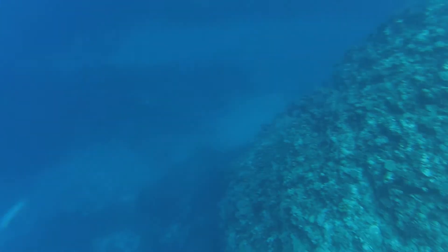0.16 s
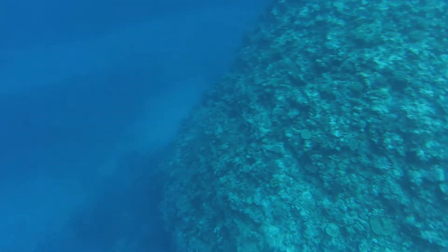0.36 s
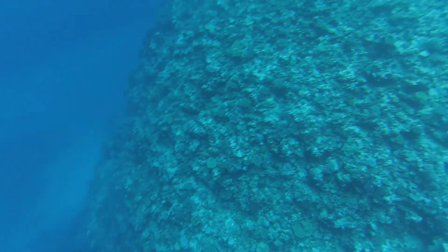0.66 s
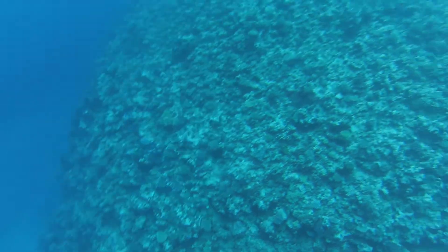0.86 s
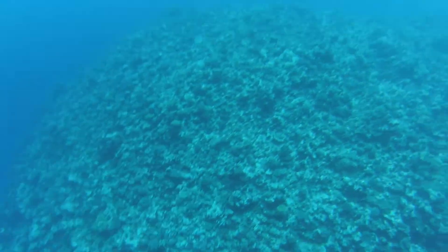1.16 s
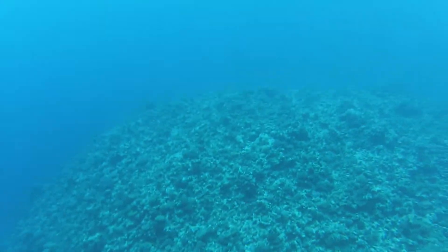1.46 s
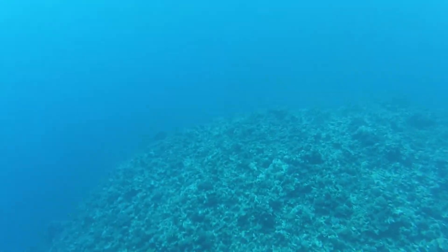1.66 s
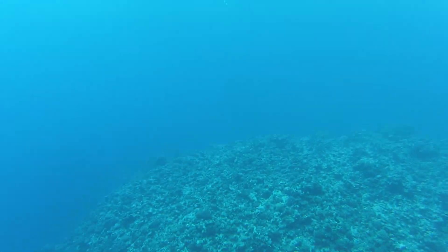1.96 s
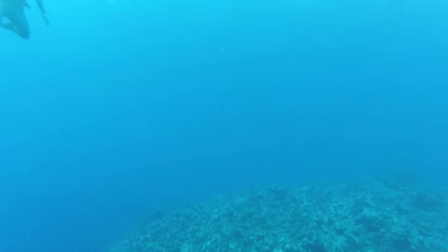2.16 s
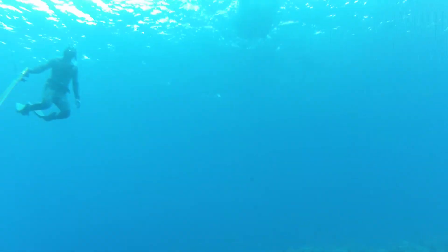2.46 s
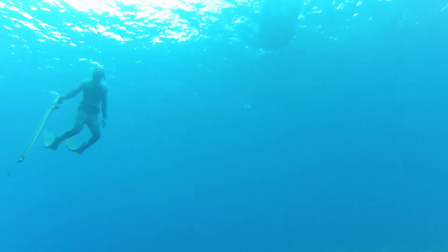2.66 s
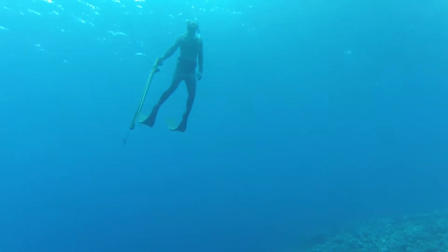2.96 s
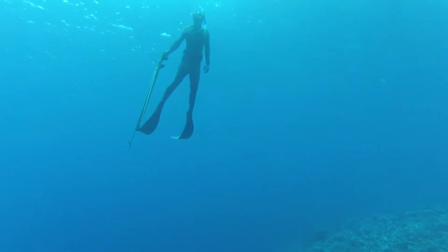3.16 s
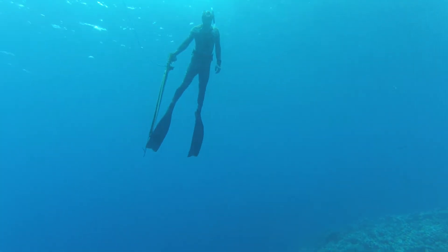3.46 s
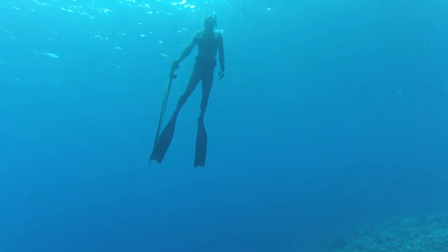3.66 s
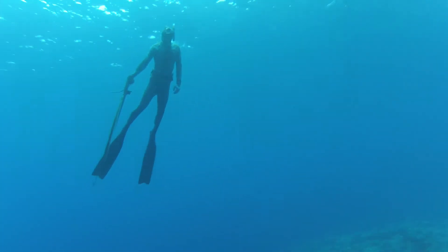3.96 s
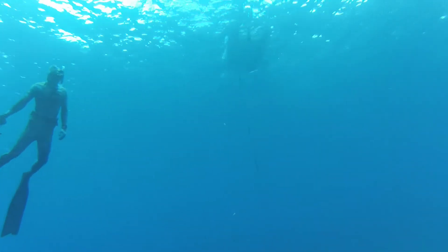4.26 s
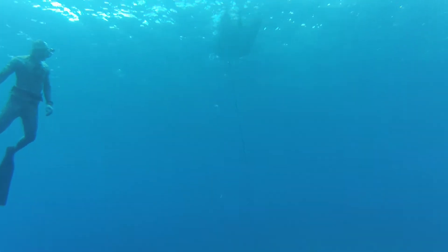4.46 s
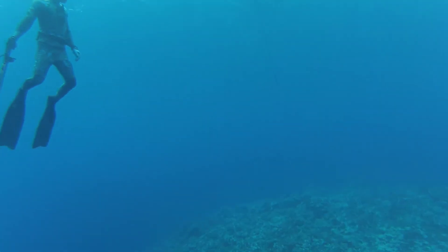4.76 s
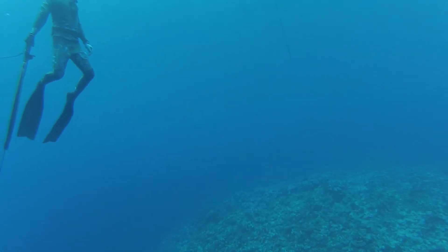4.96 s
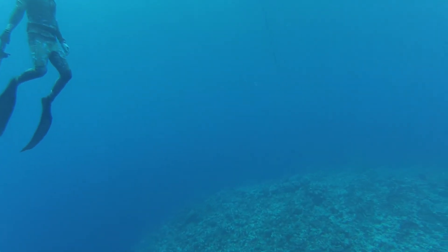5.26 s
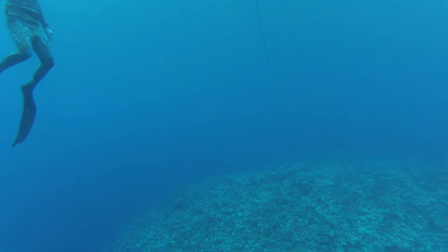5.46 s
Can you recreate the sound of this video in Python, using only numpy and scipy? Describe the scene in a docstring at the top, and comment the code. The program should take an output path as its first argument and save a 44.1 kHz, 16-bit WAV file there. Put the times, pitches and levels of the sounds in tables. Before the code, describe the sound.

Heard from inside a sealed camera housing underwater: a few bright bubble plinks and tiny snaps over low water rumble, then from about one second a dense gurgling burst of chirping bubbles and froth. After two seconds a purring leak and dry, squeaky creaks of the seal take over. It thins out to scattered ticks and bubbles, with a cluster of hard knocks near the end.

```python
"""Bubbles of trapped air break away from a camera's waterproof housing as it rises from a reef to the surface.
They ring as single damped tones, quick strings, froth, a random trickle and one even train.
As the pressure eases, the housing's seal creaks in stick-slip runs, and knocks ring the shell.
Behind them, shaped noise makes the rumble of passing water and the sea's hiss, short cracks make the
reef's snaps, and steady tones make the camera's thin whine."""
import sys
import numpy as np
from scipy import signal
from scipy.fft import rfft, irfft, next_fast_len
from scipy.io import wavfile
from scipy.ndimage import uniform_filter1d

SR = 44100
rng = np.random.default_rng(int(sys.argv[2]) if len(sys.argv) > 2 else 0)


def materialize(psi):
    """Save the field psi as 16-bit PCM at rate SR to the path in sys.argv[1].

    A 1-D psi becomes a single channel; in a 2-D psi each row is a channel.
    """
    bounded = np.clip(np.atleast_2d(psi).T, -1, 1)
    quanta = np.round(bounded * 32767).astype(np.int16)
    wavfile.write(sys.argv[1], SR, quanta)


N = 246959
TIME = np.arange(N) / SR  # seconds through the scene
RING = np.arange(4096) / SR  # seconds through one short sound


def gain_of(db):
    """Turns decibels into a factor."""
    return 10 ** (np.asarray(db) / 20)


def evened(x):
    """Scales a sound to an rms of 1."""
    return x / np.sqrt(np.mean(x ** 2) + 1e-20)


def peaked(x):
    """Scales a short sound so that its loudest 3 ms have an rms of 1."""
    power = uniform_filter1d(x ** 2, size=132, mode="constant")
    return x / np.sqrt(power.max() + 1e-20)


def add(mix, s, sound):
    """Adds a sound to the mix at s seconds."""
    part = mix[max(round(s * SR), 0):][:len(sound)]
    part += sound[:len(part)]


def follow(rows):
    """Draws straight lines between the rows of a table: one curve for each column after the time."""
    s, *columns = np.transpose(rows)
    return [np.interp(TIME, s, column) for column in columns]


def read(points, hz):
    """Reads the level in dB of a spectrum at hz, between points on a log-frequency axis."""
    f, db = np.transpose(points)
    return np.interp(np.log(hz + 1), np.log(f + 1), db)


def noise(points):
    """Makes noise of rms 1 whose spectrum has the given shape."""
    size = next_fast_len(N)
    colour = gain_of(read(points, np.fft.rfftfreq(size, 1 / SR)))
    white = rng.standard_normal(size)
    return evened(irfft(rfft(white) * colour, size)[:N])


def band(x, lo_hz, hi_hz):
    """Keeps what lies between two frequencies."""
    edges = np.sort(np.clip([lo_hz, hi_hz], 20, SR / 2 - 1))
    return signal.sosfilt(signal.butter(4, edges, "bandpass", fs=SR, output="sos"), x)


def fade_out(t60):
    """Dies away exponentially, by 60 dB in t60 seconds."""
    return np.exp(-np.log(1000) * RING / t60)


def swell_in(rise):
    """Grows from silence to full size with a time constant of rise seconds."""
    return 1 - np.exp(-RING / rise)


def ring(hz, t60, rise=0.0001, glide=0):
    """Makes one damped tone; glide is its relative rise in pitch over t60 seconds."""
    age = np.minimum(RING / max(t60, 1e-4), 2)
    turns = np.cumsum(hz * (1 + glide * age)) / SR
    return np.sin(2 * np.pi * turns) * np.exp(-np.log(1000) * age) * swell_in(rise)


def splash(lo_hz, hi_hz, t60, rise=0.0001):
    """Makes a short burst of noise in one band that swells and dies."""
    burst = rng.standard_normal(len(RING)) * fade_out(t60) * swell_in(rise)
    return peaked(band(burst, lo_hz, hi_hz))


def causal(points, tilt_db=0):
    """Makes a sharp-fronted (minimum-phase) click with the given spectrum, tilted in dB per octave."""
    hz = np.fft.rfftfreq(len(RING), 1 / SR)
    octaves = np.log2(np.clip(hz, 250, 4000) / 1000)
    db = read(points, hz) + tilt_db * octaves
    # folding the cepstrum forward packs the energy at the start
    cepstrum = irfft(np.log(gain_of(db)))
    cepstrum[1:len(RING) // 2] *= 2
    cepstrum[len(RING) // 2 + 1:] = 0
    return peaked(irfft(np.exp(rfft(cepstrum))))


# spectrum of the sea's hiss: (frequency [Hz], relative level [dB])
HISS_SPECTRUM = [(200, -2), (400, 9), (700, 21), (950, 13), (1300, -23), (2400, 22.5), (3100, 4.5),
                 (4100, 13.5), (5200, -2), (6700, 8), (8500, -2.5), (10600, 8), (12500, -3), (14300, 3),
                 (15400, -19)]
def sea_hiss(hiss_db=-60.5, ticks_db=-66, ticks_per_s=450):
    """Countless far ticks of random size lie in a steady noise of the same colour."""
    happens = rng.random(N) < ticks_per_s / SR
    sizes = gain_of(4.5 * np.minimum(rng.exponential(1, N), 4))
    clicks = happens * rng.choice([-1, 1], N) * sizes
    ticks = evened(signal.oaconvolve(clicks, causal(HISS_SPECTRUM))[:N])
    return gain_of(hiss_db) * noise(HISS_SPECTRUM) + gain_of(ticks_db) * ticks


# tones of the camera's electronics: (frequency [Hz], level [dB])
WHINE_TONES = [(11073, -90), (13066, -78), (13126, -77)]
def camera_whine(waver_rad=0.44):
    """Thin steady tones waver as slow noise pushes their phase to and fro."""
    out = np.zeros(N)
    for hz, db in WHINE_TONES:
        waver = waver_rad * noise([(2, -2), (15, -15), (80, -27), (300, -120)])
        out += gain_of(db) * np.sqrt(2) * np.sin(2 * np.pi * hz * TIME + waver)
    return out


def fizz(level_db=-33):
    """High noise rises and falls with the finest bubbles of the trickle."""
    fine_db = follow(TRICKLE_LEVELS)[-1]
    return gain_of(fine_db + level_db) * noise([(4000, -34), (7000, -47), (9000, 18), (12500, 34), (15400, 24)])


def crackle(far_db=-75, fizzing_db=-20, per_s=60, spread_db=6.0, ping_db=-3):
    """Faint snaps from the reef come at random, each with a ping, louder while the finest bubbles stream out."""
    out = np.zeros(N)
    wait, size, pitch = rng.random((400, 3)).T
    times = np.cumsum(-np.log(1 - wait)) / per_s
    strengths = np.minimum(-np.log(1 - size), 3)
    for s, strength, hz in zip(times, strengths, 6000 + 7000 * pitch):
        crack = splash(lo_hz=4200, hi_hz=11500, t60=0.007, rise=0.0006)
        ping = peaked(ring(hz, t60=0.008, rise=0.0004))
        add(out, s, gain_of(spread_db * strength) * peaked(crack + gain_of(ping_db) * ping))
    fine_db = follow(TRICKLE_LEVELS)[-1]
    return out * np.hypot(gain_of(far_db), gain_of(fine_db + fizzing_db))


# sharp snaps, likely shrimp on the reef or the tiniest bubbles:
# (time [s], level before level_db [dB], ping pitch [Hz])
SNAP_EVENTS = [(0.0593, -36, 5260), (0.083, -49, 4570), (0.2089, -43, 6000), (0.302, -37, 4670),
               (0.5117, -37, 4560), (0.566, -31, 4770), (0.9305, -31.5, 7100), (1.053, -32, 5020),
               (1.1154, -30, 4600), (1.265, -34.5, 7000), (1.4033, -24.5, 5920), (1.452, -38, 6450),
               (1.769, -38, 4660), (2.8416, -36.5, 6760), (3.615, -46, 11900), (0.5649, -37.5, 11260),
               (0.964, -39, 6900), (0.9714, -49, 11700), (0.9943, -42, 12600), (1.114, -42, 11600),
               (0.9523, -40, 6030), (1.1054, -39, 6050), (1.1564, -46, 6040), (1.188, -40, 7150),
               (1.2311, -37, 6000), (1.5377, -56, 5410), (1.3645, -39, 11900), (1.482, -33.5, 6400),
               (1.4987, -44, 12600), (1.769, -39.5, 11800), (2.0614, -45, 13280), (2.134, -34.5, 6000),
               (2.168, -36.5, 6340), (3.85, -46, 13200), (4.9968, -34, 5500), (5.1234, -39.5, 7110)]
def snaps(level_db=-7, ping_db=8):
    """Each near snap is a broad crack of noise with a short ping."""
    out = np.zeros(N)
    for s, db, hz in SNAP_EVENTS:
        crack = splash(lo_hz=3020, hi_hz=14600, t60=0.0018)
        ping = peaked(ring(hz, t60=0.015))
        add(out, s, gain_of(db + level_db) * peaked(crack + gain_of(ping_db) * ping))
    return out


# water round the housing, before the trims: (time [s], slow buffeting level [dB], rumble level [dB])
FLOW_LEVELS = [(0, -35.5, -46.5), (0.85, -40.5, -43.5), (1.2, -37.5, -43), (1.55, -42.5, -45),
               (1.65, -30, -40.5), (1.9, -43.5, -38.5), (2.3, -32.5, -39.5), (2.6, -39, -39),
               (2.85, -41, -41), (3.6, -38, -41), (4.7, -42, -38), (5.6, -37, -44)]
# strong eddies that swell the flow: (time [s], time from centre to 1/e [s], swell [dB])
SURGE_EVENTS = [(1.08, 0.039, 7), (1.29, 0.042, 6), (1.457, 0.024, 9), (1.76, 0.025, 5), (2.66, 0.023, 7),
                (4.16, 0.032, 2.5), (4.99, .03, 4.5)]
# spectrum of the slow buffeting: (frequency [Hz], relative level [dB])
BUFFET_SPECTRUM = [(4.7, -7), (8.0, 4), (22, 0), (70, -16), (91, -26), (150, -120)]
# spectrum of the rumble: (frequency [Hz], relative level [dB])
RUMBLE_SPECTRUM = [(40, -12.5), (62, 0), (100, -1.5), (145, -4.5), (175, -3.5), (215, -14), (290, -20.5),
                   (450, -24.5), (900, -104)]
def flow(buffet_trim_db=3.0, rumble_trim_db=-2, eddy_db=2.0, surge_share=0.57):
    """Eddies press slowly on the housing and rumble in its lowest resonance; a few strong ones swell both."""
    buffet_db, rumble_db = follow(FLOW_LEVELS)
    eddies = noise([(2, 0), (8, 0), (20, -40), (60, -120)])
    surge_db = sum(db * np.exp(-((TIME - s) / width) ** 2) for s, width, db in SURGE_EVENTS)
    buffet_gain = gain_of(buffet_db + buffet_trim_db + surge_share * surge_db)
    rumble_gain = gain_of(rumble_db + rumble_trim_db + surge_db + eddy_db * eddies)
    return buffet_gain * noise(BUFFET_SPECTRUM) + rumble_gain * noise(RUMBLE_SPECTRUM)


# the shell's broad, well damped answer to a knock: (frequency [Hz], relative level [dB])
SHELL_SPECTRUM = [(120, -18.5), (280, -5), (420, 2.5), (560, -2), (740, 7.5), (1020, -7.5), (1400, -3.5),
                  (1780, -10), (2050, -30), (2300, -16.5), (2750, -41), (4500, -54), (9000, -80)]
# knocks of the grip on the housing:
# (time [s], clack level before level_db [dB], thud re clack before thud_trim_db [dB], tilt [dB per octave])
KNOCK_EVENTS = [(1.095, -31, -10, -4.5), (1.194, -34, -9, 1.5), (1.208, -34.5, -12, 2),
                (2.409, -40, -25, -14), (3.292, -44, -1, -10), (3.648, -36, -6, 8), (4.087, -39.5, 2, -9),
                (4.137, -34, -5, 1), (4.159, -39.5, 8.5, -11), (4.514, -35, -6, 6), (4.623, -41.5, 3.5, -1),
                (4.6397, -28.5, -4, 5), (4.669, -27, -2, 6.5), (4.6964, -26.5, -1, 6.5),
                (4.9681, -21, -7, -1), (4.99, -32, -23, -3), (5.497, -41, -10, 0)]
def knocks(level_db=1, thud_trim_db=2, rattle_db=-13):
    """Each blow gives a broad clack of the shell, darker or brighter by its tilt, a brief rattle and a low thud."""
    out = np.zeros(N)
    for s, db, thud_db, tilt_db in KNOCK_EVENTS:
        thud_hz = 181 * rng.uniform(0.92, 1.06)
        thud = gain_of(thud_db + thud_trim_db) * peaked(ring(thud_hz, t60=0.07, rise=0.0014))
        rattle = gain_of(rattle_db) * splash(lo_hz=403, hi_hz=1690, t60=0.02, rise=0.002)
        add(out, s, gain_of(db + level_db) * (causal(SHELL_SPECTRUM, tilt_db) + rattle + thud))
    return out


def strike(modes, detune, spread_db):
    """Rings each mode of the housing; every blow lands elsewhere and so weights and tunes them anew."""
    tones = []
    for k, (hz, db, t60) in enumerate(modes):
        louder, sharper = rng.standard_normal(2)
        tone = ring(hz * (1 + detune * sharper), t60)
        tones.append((-1) ** k * gain_of(db + spread_db * louder) * tone)
    return np.array(tones)


# modes of the housing under a slip, before random changes: (frequency [Hz], relative level [dB], t60 [s])
BODY_MODES = [(435, -18.5, 0.047), (600, -7.5, 0.03), (770, 6.5, 0.003), (1330, 11.5, 0.027),
              (1744, 28, 0.0083), (2223, 9, 0.026), (2606, 22, 0.015)]
def slip(hz, window_db, window_t60, low_db, scrape_db=-8, grit_db=-13):
    """One slip of the seal rings and scrapes the housing's body and swells its window into a short ring."""
    modes = strike(BODY_MODES, detune=0.025, spread_db=1.5)
    is_low = np.array(BODY_MODES)[:, 0] < 1100
    scrape = gain_of(scrape_db) * splash(lo_hz=1110, hi_hz=2600, t60=0.027)
    body = peaked(peaked(band(modes[~is_low].sum(0), 1166, 2500)) + scrape)
    low = peaked(band(modes[is_low].sum(0), 192, 950))
    window = peaked(ring(1.02 * hz, window_t60, rise=0.0002, glide=-0.06))
    grit = gain_of(grit_db) * splash(lo_hz=3180, hi_hz=4500, t60=0.02)
    window = peaked(band(window + grit, 2370, 4700))
    return body + gain_of(low_db) * low + gain_of(window_db) * window


# single slips of the loose seal, before the trims: (time [s], body level [dB],
# window pitch before slip()'s 1.02 [Hz], window re body [dB], low modes re body [dB])
SLIP_EVENTS = [(2.336, -37, 4470, -5, -26), (2.344, -27.5, 3300, -4, -16), (2.375, -36, 3600, -5, -8),
               (2.387, -30, 3200, -2.5, -16), (2.396, -34, 4060, -4, -8), (2.409, -28.5, 3560, -6, -4.5),
               (2.4404, -32, 3570, 4, -5), (2.446, -29, 3200, -7, -20), (2.456, -34, 3100, -8, -4),
               (2.462, -35, 3730, -4, -17), (2.47, -36, 3280, -9, -14), (2.478, -36, 3290, -6, -3),
               (2.489, -44, 3280, 5, 0), (2.494, -43.5, 3850, 5.5, -1), (2.514, -42, 3200, 0, -15),
               (2.529, -32.5, 3420, 0.5, -8), (2.541, -37, 3380, 1, -20), (2.553, -32.5, 3130, -7, -4),
               (2.564, -32.5, 3540, -3, -2), (2.573, -36, 3350, -4, -14), (2.581, -36, 3470, -6, -16),
               (2.59, -36, 3600, -3, -21), (2.597, -32.5, 3080, -7, -10), (2.617, -35, 3400, 4, -13),
               (2.628, -34.5, 3630, 3.5, -9), (2.6532, -34.5, 3440, 5.5, -17),
               (2.6624, -34.5, 3700, 3.5, -12), (2.67, -36, 3880, 7, -3), (2.734, -47, 3660, 9, -9),
               (3.063, -43, 4230, -2, -6), (3.118, -42, 3640, 6.5, -2), (3.134, -40, 3630, -3, 6),
               (3.171, -41, 3520, 7, 10.5), (3.177, -36, 3360, -1, 0), (3.19, -39, 3960, -3, -6),
               (3.206, -34, 3440, -0.5, -1.5), (3.2102, -34, 3350, 2, -4), (3.283, -40.5, 3300, 8, 9.5),
               (3.291, -46.5, 3830, -9, 13.5), (3.302, -40, 3400, -5, 7), (3.398, -41.5, 4100, -8, 3),
               (3.428, -39, 3370, 7, 10), (3.438, -37.5, 3270, -2.5, 0), (3.443, -35.5, 3130, -14, 4),
               (3.45, -36, 3120, -16, 1), (3.507, -39.5, 3580, 0.5, 10), (3.513, -43, 3200, 3.5, 12),
               (3.521, -55, 3260, -1, 15), (3.599, -31.5, 3550, 3, -3), (3.61, -34, 3130, -3, -4),
               (3.614, -37, 4000, -9, -1), (3.668, -41.5, 3640, -2, 10), (3.675, -36.5, 3630, 1, 0),
               (3.693, -31.5, 3150, -10, -6), (3.8314, -40.5, 3627, -2, 10.5),
               (4.734, -41.5, 3240, -0.5, -3), (4.748, -50, 3800, 3, -6), (4.773, -45.5, 3630, 1, 13.5),
               (4.787, -41.5, 3370, 0, -1), (4.797, -42.5, 3540, -3, 9), (4.831, -54, 3800, 11, 2),
               (4.841, -56, 3480, 10, -7), (4.849, -42.5, 3460, 7, 6.5), (4.861, -39, 3160, 3, 5),
               (4.937, -34.5, 3610, 3, -4), (4.9957, -24.5, 3930, -7, -7), (5.0, -33.5, 3540, 3, -1),
               (5.004, -35, 3740, -6, -9), (5.012, -33, 3440, -2.5, -2), (5.017, -44, 3300, -3, 4)]
def slips(level_db=-1, low_trim_db=-2, window_t60=0.015, lengthening=0.16):
    """A loose seal lets go in separate slips; the harder one sets the window going, the longer it rings."""
    out = np.zeros(N)
    for s, db, hz, window_db, low_db in SLIP_EVENTS:
        t60 = window_t60 * gain_of(lengthening * window_db)
        add(out, s, gain_of(db + level_db) * slip(hz, window_db, t60, low_db + low_trim_db))
    return out


# runs of slips while the seal binds, before random changes and the trim: (start [s], number of slips,
# rate [slips per s], body level [dB], window pitch before slip()'s 1.02 [Hz], low modes re body [dB])
CREAK_RUNS = [(2.6778, 7, 135, -37.5, 4120, -7.5), (2.8784, 13, 130, -40.5, 4080, -4.5),
              (3.003, 4, 108, -38.5, 4120, -6.5), (3.2159, 4, 134, -35.5, 3900, -5.5)]
def creaks(low_trim_db=-1, jitter_s=0.0004, spread_db=1.0, pitch_spread=0.024):
    """A binding seal slips in quick, nearly even runs and damps the window to a tick."""
    out = np.zeros(N)
    for start, count, per_s, db, hz, low_db in CREAK_RUNS:
        for k in range(round(count)):
            late, size, pitch = rng.standard_normal(3)
            sound = slip(hz * (1 + pitch_spread * pitch), window_db=-2, window_t60=0.0028,
                         low_db=low_db + low_trim_db)
            add(out, start + k / per_s + jitter_s * late, gain_of(db + spread_db * size) * sound)
    return out


# colour of the trickle's bubbles: (frequency [Hz], relative level [dB])
TRICKLE_SPECTRUM = [(280, -34), (410, 10), (530, 4), (760, 15.5), (1050, 6.5), (1500, 11.5), (2400, 14.5),
                    (2950, -19), (3550, 0), (4300, -13), (5300, -51), (6100, -3.5), (7100, -35),
                    (8200, -57)]
def swarm(db, lo_hz, hi_hz, per_s, cycles, spread_db, near_db, count=30):
    """Bubbles of random size on many pitches ring out separately when loud and blur to a wash when faint."""
    pops, pitches = np.zeros(N), np.geomspace(lo_hz, hi_hz, count)
    for hz in pitches:
        wait, size, sign = rng.random((3, 400))
        born = np.cumsum(-np.log(1 - wait)) * count / per_s
        size = gain_of(spread_db * np.minimum(-np.log(1 - size), 3)) * np.sign(sign - 0.5)
        keep = born < (N - 1) / SR
        clicks = np.bincount((born[keep] * SR).astype(int), size[keep], N)
        pop = evened(ring(hz, cycles / hz, rise=0.0005, glide=0.03))
        weight = gain_of(read(TRICKLE_SPECTRUM, hz)) * np.sqrt(hz)
        pops += weight * signal.oaconvolve(clicks, pop)[:N]
    wash = noise([(lo_hz / 2, -60), *zip(pitches, read(HISS_SPECTRUM, pitches)), (1.37 * hi_hz, -50)])
    separate = np.clip(1 + (db - near_db) / 14, 0.25, 0.93)  # share of the power in single pops
    return gain_of(db) * (np.sqrt(separate) * evened(pops) + np.sqrt(1 - separate) * wash)


# the trickle, before the holding down and the trim below:
# (time [s], large-bubble level [dB], middling-bubble level [dB], fine-bubble level [dB])
TRICKLE_LEVELS = [(0.0, -48.5, -54, -59), (0.91, -47, -42, -46.5), (0.94, -40.5, -47, -41),
                  (1.12, -39.5, -41, -36), (1.46, -42, -36, -64), (1.57, -31.5, -27, -39),
                  (1.73, -38.5, -30.5, -49), (1.9, -30.5, -30.5, -53), (2.02, -35, -30.5, -52),
                  (2.12, -35.5, -39.5, -53.5), (2.56, -48.5, -47.5, -57), (2.73, -47, -48, -54),
                  (2.95, -53.5, -55, -57), (3.09, -45.5, -54.5, -53.5), (3.27, -50, -56, -52.5),
                  (3.45, -52, -60, -64.5), (3.63, -49.5, -57, -59), (3.88, -46.5, -57, -66),
                  (4.79, -52, -56, -62.5), (5.6, -50, -59.5, -64)]
def trickle(fine_trim_db=0.5):
    """Air and water work through the gaps; the gurgling is held down most before the leak, freed as its rate falls."""
    large_db, middling_db, fine_db = follow(TRICKLE_LEVELS)
    hold = gain_of(follow(LEAK_TRAIN)[-1])  # the leak's bubble rate, read as decibels
    gurgling = 1 - 0.78 * hold / hold.max()
    large = swarm(large_db, 307, 1026, per_s=450, cycles=25, spread_db=6.0, near_db=-46)
    middling = swarm(middling_db, 1035, 2814, per_s=880, cycles=28, spread_db=2.0, near_db=-60)
    fine = swarm(fine_db + fine_trim_db, 2970, 7910, per_s=900, cycles=30, spread_db=8.5, near_db=-53.5)
    return gurgling * (large + middling) + gurgling ** 2 * fine


# the housing's answer to a bubble of the leak: (frequency [Hz], relative level [dB])
LEAK_SPECTRUM = [(200, -18), (420, 1), (520, -8), (680, 3.5), (770, 12.5), (900, 2), (1030, 6), (1200, -9),
                 (1550, -9), (1900, -6), (2280, 6.5), (2650, -22), (3100, -24), (4000, -27), (6000, -38)]
# a thin leak, before its random spread: (time [s], level [dB], rate [bubbles per s])
LEAK_TRAIN = [(2.05, -56, 86), (2.25, -43, 80.8), (2.5, -41, 74.5), (2.66, -39, 70.8), (2.82, -39.5, 68.3),
              (2.98, -42.5, 65.4), (3.07, -44, 62.5), (3.25, -54, 58)]
def leak(spread_db=1.5):
    """Evenly spaced bubbles tap the housing alike, ever more slowly, so the train purrs at a falling pitch."""
    db, per_s = follow(LEAK_TRAIN)
    running = (TIME > LEAK_TRAIN[0][0]) * (TIME < LEAK_TRAIN[-1][0])
    # a bubble leaves each time the running count passes a whole number
    released = np.diff(np.floor(np.cumsum(per_s * running) / SR), prepend=0)
    taps = released * gain_of(db + spread_db * rng.standard_normal(N))
    return signal.oaconvolve(taps, causal(LEAK_SPECTRUM))[:N]


# how strongly the housing passes a chirp: (frequency [Hz], gain [dB])
FROTH_SPECTRUM = [(1300, 0), (2400, 1), (2950, -5), (3500, 0), (4400, -4)]
# spurts of froth: (start [s], length [s], level before level_db and spread [dB], treble re chirps [dB])
SPURT_EVENTS = [(0.925, .05, -43.5, -12), (1.005, .125, -41.5, -12.5), (1.15, .17, -39.5, -14),
                (1.32, .14, -45.5, -16), (1.47, .09, -43, -20), (1.56, .08, -40, -18),
                (1.65, .07, -43.5, -19), (1.72, .06, -35, -19.5), (1.785, .09, -44, -29),
                (1.93, .065, -39, -22.5), (2.075, .185, -37.5, -25.5), (2.33, .15, -46, -20),
                (4.09, .12, -54.5, -11), (4.37, .07, -53.5, -24), (5.13, .03, -52, -15),
                (5.43, .08, -55, -15)]
def froth(level_db=-1, spread_db=4, per_s=210, lo_hz=1300, hi_hz=4400, crack_db=-1.98, spit_db=-17):
    """Each tiny bubble of a spurt cracks softly, chirps at its own pitch and spatters finely into the treble."""
    chirps, cracks, spatter = np.zeros((3, N))
    for start, length, db, treble_db in SPURT_EVENTS:
        for age in np.arange(0, length, 1 / per_s):
            late, pitch, fine = rng.random(3)
            s = start + age + late / per_s
            size = gain_of(db + level_db + spread_db * np.clip(rng.standard_normal(), -2, 2))
            crack = peaked(rng.standard_normal(len(RING)) * fade_out(0.007))
            hz = lo_hz * (hi_hz / lo_hz) ** pitch
            chirp = gain_of(read(FROTH_SPECTRUM, hz)) * peaked(ring(hz, 50 / hz, rise=0.0008, glide=0.07))
            ping = gain_of(treble_db) * peaked(ring(4400 + 2900 * fine, t60=0.011, rise=0.0004))
            add(chirps, s, size * (chirp + ping))
            add(cracks, s, size * gain_of(crack_db) * crack)
            add(spatter, s, size * gain_of(treble_db) * crack)
    spit = gain_of(spit_db) * band(spatter, 7600, 14500)
    return chirps + band(cracks, 1250, 4100) + band(spatter, 4000, 7600) + spit


def bubble(hz, companion_hz, companion_db, cycles=50, splash_db=-7, tick_db=-16):
    """A bubble breaks away and rings with a companion; the splash grows with the companion, up to 0 dB."""
    main, companion = (peaked(ring(f, min(cycles / f, 0.045), rise=0.00013, glide=0.04))
                       for f in (hz, companion_hz))
    spray = gain_of(splash_db) * splash(lo_hz=1440, hi_hz=3500, t60=0.032, rise=0.0027)
    spray += gain_of(tick_db) * splash(lo_hz=3180, hi_hz=6700, t60=0.011)
    return peaked(main + gain_of(companion_db) * companion + gain_of(min(companion_db, 0)) * spray)


# pockets of air that burst, before random changes and level_db: (start [s], length [s], level [dB],
# starting pitch [Hz], level change over the string [dB], starting glug pitch [Hz], glug re bubbles [dB])
GUSH_EVENTS = [(1.036, 0.033, -22.5, 2050, -7, 810, -27), (1.21, 0.02, -23.5, 2440, -8, 686, -12),
               (1.716, 0.025, -28, 2180, 4, 780, -8), (1.747, 0.027, -18, 1680, -2.5, 776, -15),
               (1.936, 0.025, -28.5, 1310, 0, 520, -11), (2.06, 0.0099, -28.5, 1370, -12, 526, -4),
               (2.184, 0.0372, -25.5, 1800, -1.5, 461, -7), (4.087, 0.033, -46, 2150, 4.5, 650, 6),
               (4.172, 0.041, -62.5, 2060, 11, 689, 20)]
def gushes(level_db=-7, per_s=170, jitter_s=0.0008, spread_db=1.5,
           pitch_spread=0.129, companion_spread=0.174, glug_spread=0.19):
    """A pocket of air tears into bubbles of like size in quick succession, over the glug of larger ones."""
    out = np.zeros(N)
    for start, length, db, hz, fade_db, glug_hz, glug_db in GUSH_EVENTS:
        for age in np.arange(0, length, 1 / per_s):
            late, size, pitch, depth, small = rng.standard_normal(5)
            glug = peaked(ring(glug_hz * np.exp(glug_spread * depth), t60=0.05, rise=0.0015, glide=0.15))
            companion_hz = 3290 * np.exp(companion_spread * small)
            pop = bubble(hz * np.exp(pitch_spread * pitch), companion_hz, companion_db=-4)
            level = db + level_db + fade_db * age / length + spread_db * size
            add(out, start + age + jitter_s * late, gain_of(level) * (pop + gain_of(glug_db) * glug))
    return out


# single bubbles that break away: (time [s], level before level_db [dB], starting pitch [Hz],
# companion's starting pitch [Hz], companion re bubble [dB])
BUBBLE_EVENTS = [(0.0584, -14, 1937, 3000, -6.5), (0.0773, -17.5, 2540, 3360, -11),
                 (0.086, -21, 1890, 3380, 0), (0.096, -28, 4400, 2300, -26), (.177, -29.5, 2780, 3500, 0.5),
                 (0.21, -32.5, 2800, 3070, -5), (.296, -30, 2500, 3370, 4), (0.303, -18, 2510, 3280, -0.5),
                 (0.3102, -18.5, 2620, 4530, -7), (0.3168, -22.5, 2830, 3430, 0),
                 (0.33, -24.5, 2450, 3360, 8), (.338, -29, 3030, 4040, -1), (0.43, -31, 2580, 2820, -3),
                 (.5107, -22, 2455, 2650, -5), (0.929, -25, 2110, 3270, -4), (0.9642, -20.5, 2350, 2860, 2),
                 (1.0082, -27, 2400, 3430, 0), (1.016, -22.5, 2700, 3540, 4),
                 (1.0404, -13.5, 1990, 3500, -32), (1.06, -23, 2330, 3750, 9),
                 (1.135, -24, 3470, 4300, -18), (1.177, -23, 3500, 4200, -15),
                 (1.191, -20, 608, 2020, -5.5), (1.192, -21, 807, 3200, -11), (1.2, -23, 440, 2060, 7),
                 (1.282, -22.5, 2110, 2960, -6), (1.307, -24, 2530, 3330, -10),
                 (1.331, -26.5, 4500, 3500, -4), (1.366, -19.5, 3410, 2540, -8),
                 (1.4033, -23.5, 2900, 3570, 2), (1.411, -23.5, 2780, 3400, -22),
                 (1.432, -24, 2430, 3650, -5), (1.474, -17, 2410, 3480, -4), (1.49, -26, 3320, 2400, -17),
                 (1.509, -26, 1950, 2500, -15), (1.538, -18, 3890, 2130, -7), (1.551, -28, 2340, 3530, -8),
                 (1.573, -27, 3420, 1920, -12), (1.583, -20.5, 1474, 2870, -19),
                 (1.6, -23.5, 1430, 2500, -8), (1.608, -25, 2170, 3370, -5), (1.6227, -21, 1690, 3800, -2),
                 (1.642, -23.5, 3700, 2180, -18), (1.673, -24.5, 3340, 2300, -22),
                 (1.691, -23.5, 1310, 2500, -1), (1.789, -28, 766, 3400, -30), (1.801, -19, 2300, 1700, -8),
                 (1.818, -23, 2070, 3060, -13), (1.841, -15, 1606, 3750, -28),
                 (1.8664, -19.5, 1710, 2120, -14), (1.9054, -21, 1780, 2417, 8),
                 (1.93, -22, 1350, 2910, -29), (1.935, -22, 2310, 1820, -11), (1.96, -25, 1490, 3370, -16),
                 (1.989, -28, 1780, 3900, -3), (2.0433, -15.5, 1288, 3970, -7.5),
                 (2.106, -17, 1568, 3600, -10), (2.123, -16, 1450, 3600, -8),
                 (2.167, -15.5, 2030, 3360, -2), (2.244, -21.5, 1800, 1540, -6),
                 (2.297, -20.5, 1705, 3970, -6), (2.356, -15.5, 2330, 3360, -16),
                 (3.7438, -30.5, 2160, 1600, -12), (3.774, -32.5, 1600, 2260, -8),
                 (3.926, -24, 1960, 2260, -13), (4.097, -30, 2230, 1300, -6), (4.177, -37, 2410, 2030, -12),
                 (4.203, -26.5, 2160, 1530, 0.5), (4.517, -28.5, 1430, 2170, -7),
                 (5.0665, -30.5, 2110, 3880, -3), (5.2373, -33.5, 1540, 1900, -21),
                 (5.31, -32, 1650, 2200, -29), (5.451, -33, 2300, 3870, -5)]
def bubbles(level_db=-8.0):
    """The clearest single bubbles each ring once as they break away."""
    out = np.zeros(N)
    for s, db, hz, companion_hz, companion_db in BUBBLE_EVENTS:
        add(out, s, gain_of(db + level_db) * bubble(hz, companion_hz, companion_db))
    return out


def scene():
    """Adds up all sources at one microphone inside the housing."""
    background = sea_hiss() + camera_whine() + fizz() + crackle() + snaps() + flow()
    housing = knocks() + slips() + creaks()
    air = trickle() + leak() + froth() + gushes() + bubbles()
    return (background + housing + air)[None]


def record(dry, edge_hz=15600):
    """The recorder's band limit takes away the highest treble."""
    lowpass = signal.firwin(511, edge_hz, window=("kaiser", 9), fs=SR)
    return signal.oaconvolve(dry, lowpass[None], "same")


dry = scene()
out = record(dry)
materialize(out)
```